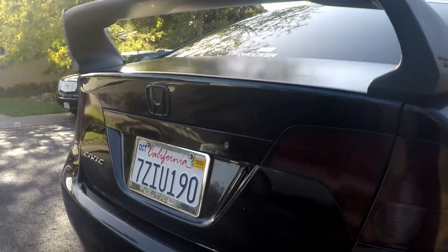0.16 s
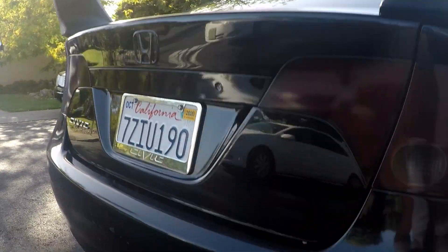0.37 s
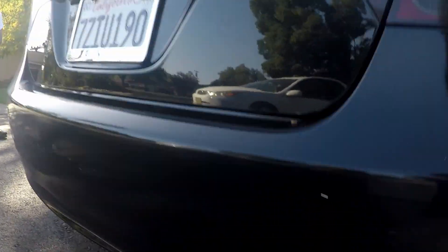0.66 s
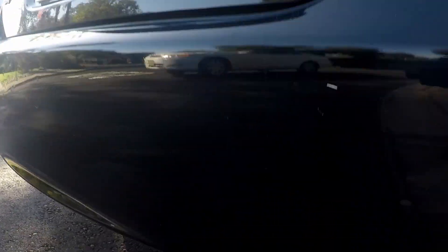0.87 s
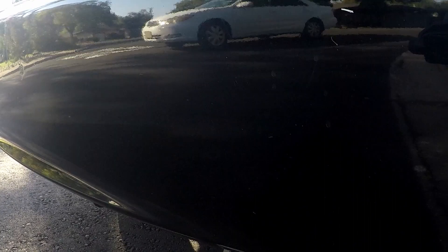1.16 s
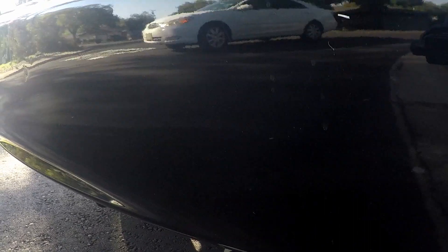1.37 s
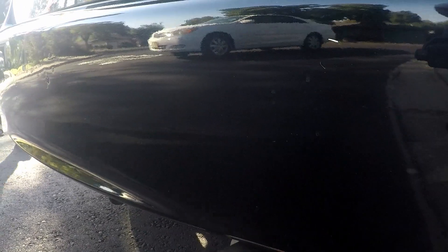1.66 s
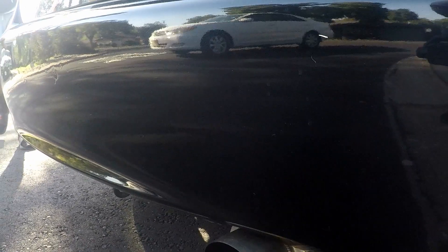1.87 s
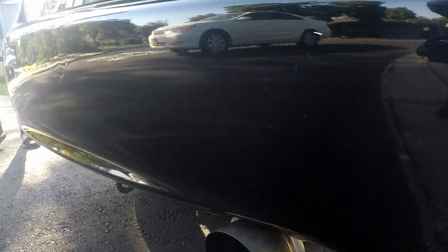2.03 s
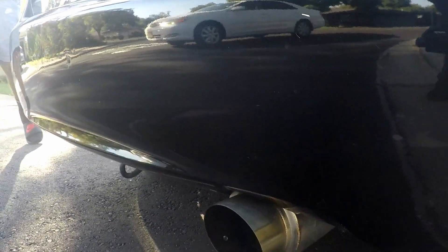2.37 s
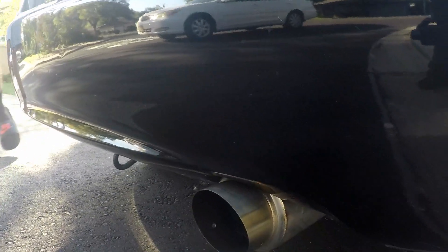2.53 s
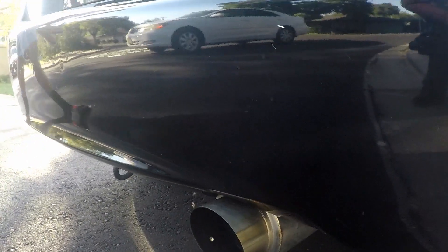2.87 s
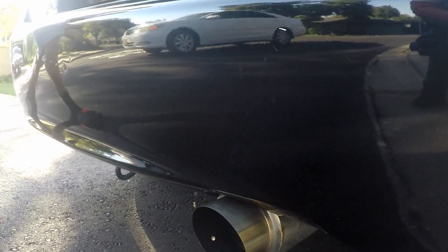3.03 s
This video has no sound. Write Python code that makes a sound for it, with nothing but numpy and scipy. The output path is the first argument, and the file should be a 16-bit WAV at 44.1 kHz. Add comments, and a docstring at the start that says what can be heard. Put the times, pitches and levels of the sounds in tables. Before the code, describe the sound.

Car exhaust close up: soft idle putts, a swelling revved drone, then stuttering limiter thumps outdoors

```python
"""Small car idling, then revved to its limiter

Heard beside a wide tailpipe: soft uneven putts, then firing pulses through a pipe response that speed up
into a drone. At the top the rev limiter makes it stumble, thump and pop: tabulated level dips, slips of
the pulse train, struck resonances and noise bursts. Pulsed noise gives the gas hiss of each firing."""
import sys
import numpy as np
from scipy import signal
from scipy.fft import rfft, irfft, next_fast_len
from scipy.io import wavfile
from scipy.ndimage import map_coordinates

SR = 44100
rng = np.random.default_rng(int(sys.argv[2]) if len(sys.argv) > 2 else 0)


def bounce(signal):
    """Save signal as a 16-bit WAV file at the path given by the first command-line argument."""
    frames = np.transpose(np.atleast_2d(signal))
    limited = np.clip(frames, -1, 1)
    pcm = np.round(limited * 32767).astype(np.int16)
    wavfile.write(sys.argv[1], SR, pcm)


N = 141120
TIME_S = np.arange(N) / SR
FIRST_FIRING_S = 0.7202

# turbulence in the pipe: f/Hz, relative density/dB
ROAR_SPECTRUM = [(150, -13.5), (350, 4.5), (480, -3), (570, -38.5), (680, 2.5), (820, 0), (980, -2),
                 (1120, -15), (1300, -13), (1600, -15.5), (2300, -22), (3200, -26), (6000, -54.5)]
# gas jet at the pipe mouth: f/Hz, relative density/dB
JET_SPECTRUM = [(500, -25.5), (1500, 8), (2300, -0.5), (2800, -1.5), (3700, 3), (5000, -0.5), (7000, 3),
                (8800, -2), (9600, -9.5), (11500, -17.5), (13000, -20.5), (15500, -22.5)]


def amp(db):
    """Decibels to gain."""
    return 10 ** (np.asarray(db) / 20)


def unit(x):
    """Scale to rms 1."""
    return x / np.sqrt(np.mean(x ** 2) + 1e-20)


def curves(rows):
    """Interpolate each column after the time to one value per sample."""
    s, *cols = np.transpose(rows)
    return [np.interp(TIME_S, s, col) for col in cols]


def gain(points, hz):
    """Gain of (f/Hz, level/dB) points joined on a log frequency axis."""
    f, db = np.transpose(points)
    return amp(np.interp(np.log(hz + 1), np.log(f + 1), db))


def below(hz, edge_hz, order=12):
    """Smooth low-pass gain, one half at the edge."""
    return 1 / (1 + (hz / edge_hz) ** order)


def filtered(x, response):
    """Apply a response of frequency to zero-padded x."""
    m = 2 * next_fast_len(N)
    hz = np.fft.rfftfreq(m, 1 / SR)
    return irfft(rfft(x, m) * response(hz), m)[:N]


def causal(g):
    """Minimum-phase response of gain g, by folding its cepstrum."""
    cepstrum = irfft(np.log(g))
    half = len(cepstrum) // 2
    folded = np.r_[cepstrum[0], 2 * cepstrum[1:half], cepstrum[half]]
    return np.exp(rfft(folded, len(cepstrum)))


def noise(colour):
    """Coloured noise of rms 1."""
    white = rng.standard_normal(N)
    return unit(filtered(white, lambda hz: gain(colour, hz)))


def steady(x, window_samples=4400):
    """Bring the running rms close to 1, keeping the shape of each pulse."""
    window = signal.windows.hann(window_samples)
    power = np.abs(signal.fftconvolve(x ** 2, window / window.sum(), "same"))
    return x / np.sqrt(power + power.mean() * amp(-40))


def burst(s, attack_s, t60_s):
    """Envelope of one blow at s: exponential rise and decay."""
    t = np.maximum(TIME_S - s, 0)
    return (1 - np.exp(-t / attack_s)) * amp(-60 * t / t60_s)


def ring(s, hz, attack_s, t60_s):
    """One pipe resonance struck at s: a decaying sine."""
    return burst(s, attack_s, t60_s) * np.sin(2 * np.pi * hz * (TIME_S - s))


def revving():
    """0 at idle, 1 once the throttle is open; ramps up over 2.5 ms to the first firing."""
    return np.clip((TIME_S - FIRST_FIRING_S) / 0.0025 + 1, 0, 1)


def street():
    """Street and engine-bay background: steady coloured noise."""
    # f/Hz, relative density/dB
    street_spectrum = [(100, 0), (800, -4), (1500, -13), (3000, -23), (8000, -26), (11000, -42),
                       (15000, -58)]
    return amp(-58.5) * noise(street_spectrum)


def scrapes():
    """Short scuffs within the idle rustle: enveloped bands of noise."""
    # t/s, nominal f/Hz, level/dB
    scuffs = [(0.189, 3630, -40.5), (.235, 4100, -41), (.33, 1700, -46), (.44, 2130, -48),
              (.525, 1860, -39.5)]

    def scuff(hz):
        return noise([(hz / 2, -30), (hz * 1.1, -10), (hz, 0), (hz * 0.4, -10), (hz * 2, -25), (hz * 4, -50)])

    return sum(amp(db) * burst(s, attack_s=0.004, t60_s=0.12) * scuff(hz) for s, hz, db in scuffs)


def rumble():
    """Low idle burble: coloured noise that stops as the throttle opens."""
    # f/Hz, relative density/dB
    burble_spectrum = [(12, -60), (20, -1), (65, -13.5), (131, -29), (171, -23.5), (243, -30), (323, -31),
                       (500, -52), (582, -76), (900, -51), (1100, -68), (1430, -91), (2420, -120)]
    return amp(-22.5) * noise(burble_spectrum) * (1 - revving())


def grain(rough_db, rate_hz):
    """Fast random flutter of level, rms 1."""
    flutter = map_coordinates(rng.standard_normal(N // 10), [TIME_S * rate_hz])
    return unit(amp(rough_db * flutter))


def rustle():
    """Rustling idle hiss: coloured noise with a fluttering level."""
    # t/s, level/dB
    hiss_levels = [(0, -51.5), (.17, -53.5), (.25, -42), (.3, -48), (.4, -52), (.49, -43), (.55, -46.5),
                   (.6, -51), (.65, -42.5), (.71, -44), (.78, -56.5), (.92, -54.5), (1.05, -72)]
    # f/Hz, relative density/dB
    hiss_spectrum = [(290, -23.5), (500, 5.5), (545, -25), (666, 0), (901, -2.5), (1090, -20), (1200, -7.5),
                     (1560, -4), (2100, -5.5), (2610, -10), (7240, -10), (9240, -14.5), (15500, -42.5)]
    hiss_db, = curves(hiss_levels)
    return amp(hiss_db) * noise(hiss_spectrum) * grain(rough_db=1.5, rate_hz=160)


def putts():
    """Uneven idle firings: each strikes a low thud and a pipe ring."""
    # t/s, thud level/dB, pipe ring level/dB
    strokes = [(.005, -37, -20), (0.069, -28, -25), (0.137, -4.5, -26), (0.196, -42, -23.5),
               (0.301, -9, -44), (0.359, -37, -36), (.422, -11.5, -20.5), (.48, -8.5, -35),
               (0.541, -16.5, -19.5), (0.596, -7, -28), (0.632, -9, -23.5), (.668, -2.5, -18.5)]
    out = np.zeros(N)
    for s, thud_db, ring_db in strokes:
        out += amp(thud_db) * ring(s, hz=63.8, attack_s=0.005, t60_s=0.16)
        out += amp(ring_db) * ring(s, hz=320.4, attack_s=0.004, t60_s=0.066)
    return out


def limiter_thumps():
    """The limiter switching the firing off or on jolts the gas column: a struck low resonance."""
    # t/s, level/dB
    jolts = [(2.132, -1), (2.255, -1), (2.278, -28.5), (2.354, -5), (2.397, 1), (2.498, -0.5), (2.774, 0),
             (2.852, -6), (2.885, 2), (3.099, -3), (3.185, -44)]
    return sum(amp(db) * ring(s, hz=102, attack_s=0.0027, t60_s=0.055) for s, db in jolts)


def fuel_pops():
    """Unburnt fuel pops in the pipe: bursts of roar and jet noise."""
    # t/s, body level/dB, crack level/dB
    blasts = [(2.414, -18, -34.5), (2.766, -16.5, -27), (2.78, -37.5, -31), (3.097, -21, -33.5)]
    body, crack = noise(ROAR_SPECTRUM), noise(JET_SPECTRUM)
    out = np.zeros(N)
    for s, body_db, crack_db in blasts:
        blast = amp(body_db) * body + amp(crack_db) * crack
        out += burst(s, attack_s=0.00055, t60_s=0.038) * blast
    return out


def firings():
    """Sample positions of the firings: whole cycles of the integrated firing rate."""
    # engine speed: t/s, firing rate/Hz
    speed = [(0.72, 20.0), (0.79, 26.2), (0.83, 32.1), (1.0, 38.5), (1.18, 45.7), (1.42, 50.4),
             (1.55, 51.6), (1.62, 57.6), (1.7, 70.0), (1.8, 91.6), (1.9, 114.8), (2.0, 133.1),
             (2.06, 142.6), (2.13, 142.1), (2.17, 145), (2.25, 160), (2.34, 151), (2.4, 153), (2.49, 169),
             (2.62, 165), (2.78, 152), (2.87, 168), (2.98, 161.5), (3.11, 153), (3.16, 163), (3.2, 157)]
    # an unfired cylinder sucks where a fired one blows, so pulses slip at switches: t/s, advance/cycles
    slips = [(2.283, .5), (2.385, -.35), (2.527, .55), (2.775, -.25), (2.915, .45), (3.112, -.3)]
    slip_s, waver_cycles, waver_hz = 0.011, 0.016, 24
    rate_hz, = curves(speed)
    cycles = np.cumsum(rate_hz) / SR
    cycles = cycles + sum(step * (1 + np.tanh((TIME_S - s) / slip_s)) / 2 for s, step in slips)
    # the speed is never quite steady
    waver = map_coordinates(rng.standard_normal(N // 100), [TIME_S * waver_hz])
    cycles = cycles + waver_cycles * waver
    cycles = cycles - np.interp(FIRST_FIRING_S, TIME_S, cycles)
    return np.interp(np.arange(int(cycles[-1])), cycles, np.arange(N))


def pulses(at, uneven_db, scatter_db):
    """One impulse per firing, sized by its cylinder and by chance, split between two samples."""
    # relative unevenness of the four cylinders, in firing order
    cylinders = [1.06, -1, .94, -1]
    jitter_s = 0.00004
    strength, delay = rng.standard_normal((len(at), 2)).T
    sizes = amp(uneven_db * np.resize(cylinders, len(at)) + scatter_db * strength)
    at = at + jitter_s * SR * delay
    i, part = at.astype(int), at % 1
    early = np.bincount(i, sizes * (1 - part), N)[:N]
    late = np.bincount(i + 1, sizes * part, N)[:N]
    return early + late


def pipe(x, band):
    """One band of the pipe's minimum-phase answer to pulses x, with its returning waves."""
    # answer to one firing: f/Hz, level/dB
    pipe_response = [(10, -44.5), (25, -15), (50, 7.5), (110, 9), (160, 13), (230, -1.5), (315, -10.5),
                     (365, -20.5), (410, -26.5), (480, -38), (570, -35.5), (650, -28.5), (800, -25),
                     (950, -36.5), (1120, -57.5), (1250, -44), (1550, -52.5), (2400, -63.5), (3200, -70),
                     (5000, -92)]
    # waves returning along the pipe: delay/s, gain
    returns = [(0.0098, 0.081), (0.0223, -0.2)]

    def response(hz):
        returning = sum(g * np.exp(-2j * np.pi * hz * s) for s, g in returns)
        echoes = 1 + below(hz, 620, order=4) * returning
        return causal(gain(pipe_response, hz)) * echoes * band(hz)

    return steady(filtered(x, response))


def puffs(at, colour, attack_s, t60_s, between, scatter_db):
    """Noise that swells with every firing, over a steady share of flow between."""
    x = pulses(at, uneven_db=-2.0, scatter_db=scatter_db)
    gate = steady(signal.fftconvolve(x, burst(0, attack_s, t60_s))[:N])
    return noise(colour) * (gate + between) / np.hypot(1, between)


def exhaust():
    """Firing pulses boom, bark and rasp through the pipe; turbulence and jet hiss ride on them."""
    # t/s, boom level/dB, bark level/dB, rasp level/dB, hiss level/dB
    band_levels = [(0.72, -11.5, -25.5, -46, -46.5), (0.78, -13, -25.5, -42, -51.5),
                   (0.9, -10.5, -29, -52, -55.5), (1.05, -12, -28, -56.5, -68.5),
                   (1.3, -12, -29, -60.5, -85), (1.5, -15, -27.5, -73, -86.5),
                   (1.57, -10.5, -27.5, -44, -58.5), (1.63, -9.0, -15.5, -44.5, -52.5),
                   (1.71, -7, -20.5, -38, -50.5), (1.76, -13, -18.5, -39, -56),
                   (1.85, -8.5, -18, -35.5, -56), (1.91, -10.0, -25, -37, -57),
                   (1.96, -8.5, -15.0, -29.5, -48.5), (2.05, -12.0, -20.5, -41.5, -62),
                   (2.125, -16, -25, -52, -82), (2.16, -9.0, -20.5, -30.5, -49),
                   (2.25, -7.5, -15.5, -31.5, -44), (2.265, -21.5, -39.5, -51, -64.5),
                   (2.29, -5, -32.0, -43.5, -58.0), (2.335, -11.5, -45.5, -43, -65),
                   (2.355, -4.5, -16.5, -33.5, -49.5), (2.38, -27.5, -17.5, -45.5, -68.5),
                   (2.398, -3.5, -34.5, -38.5, -61), (2.415, -11.5, -13.5, -34.5, -48),
                   (2.495, -6.5, -23, -31, -43.0), (2.51, -16, -24, -43.5, -62.5),
                   (2.54, -6.5, -33.5, -41, -57.5), (2.64, -9.5, -20.5, -43.5, -61.5),
                   (2.755, -9.0, -18, -43, -56.5), (2.8, -12.5, -18, -30.5, -51.5),
                   (2.845, -22, -20, -47, -62), (2.875, -5.5, -24, -27, -49.5),
                   (2.895, -16, -25.5, -44.5, -63), (2.93, -8, -24, -43, -57.5),
                   (3.085, -8.5, -23.5, -45.5, -58), (3.125, -12.5, -18.0, -39.5, -63.5),
                   (3.18, -18.5, -17.5, -46, -69), (3.2, -14, -46, -29, -48)]
    # low turbulence: f/Hz, relative density/dB
    gurgle_spectrum = [(60, -25), (130, -6), (200, -2), (300, 0), (380, -2), (440, -15), (560, -26),
                       (900, -50)]
    boom_top_hz, bark_top_hz, rasp_top_hz = 229.2, 513, 5000
    bark_lead_s = 0.004064  # the pipe is dispersive: the bark leaves ahead of the boom
    at = firings()
    boom_db, bark_db, rasp_db, hiss_db = curves(band_levels)

    # uneven cylinders put a line an octave under the drone
    boom_pulses = pulses(at, uneven_db=0.9, scatter_db=0.18)
    bark_pulses = pulses(at - bark_lead_s * SR, uneven_db=3.4, scatter_db=0.35)
    rasp_pulses = pulses(at, uneven_db=3, scatter_db=0.7)
    boom = pipe(boom_pulses, lambda hz: below(hz, boom_top_hz))
    bark = pipe(bark_pulses, lambda hz: below(hz, bark_top_hz) - below(hz, boom_top_hz))
    rasp = pipe(rasp_pulses, lambda hz: below(hz, rasp_top_hz, order=6) - below(hz, bark_top_hz))

    gurgle = puffs(at, gurgle_spectrum, attack_s=0.003, t60_s=0.034, between=0.6, scatter_db=0.5)
    roar = puffs(at, ROAR_SPECTRUM, attack_s=0.006, t60_s=0.035, between=0.25, scatter_db=1.0)
    jet = puffs(at, JET_SPECTRUM, attack_s=0.0025, t60_s=0.015, between=0.45, scatter_db=2.5)

    lower = amp(boom_db) * boom + amp(bark_db) * (bark + amp(-16) * gurgle)
    upper = amp(rasp_db) * (rasp + amp(-7) * roar) + amp(hiss_db) * jet
    return revving() * (lower + upper)


def scene():
    """The car over a quiet street."""
    background = street() + scrapes()
    idle = rumble() + rustle() + putts()
    limiter = limiter_thumps() + fuel_pops()
    return (background + idle + limiter + exhaust())[None]


def record(dry):
    """Round off the highest peaks, then band-limit to 14 Hz - 15.7 kHz."""
    rounded = dry[0] / (1 + np.abs(dry[0] / 0.86) ** 8) ** (1 / 8)
    return filtered(rounded, lambda hz: (1 - below(hz, 14, order=4)) * below(hz, 15700, order=90))[None]


dry = scene()
out = record(dry)
bounce(out)
```